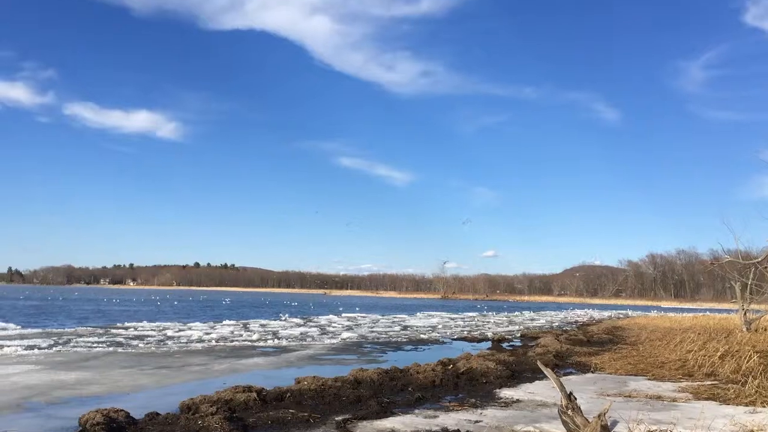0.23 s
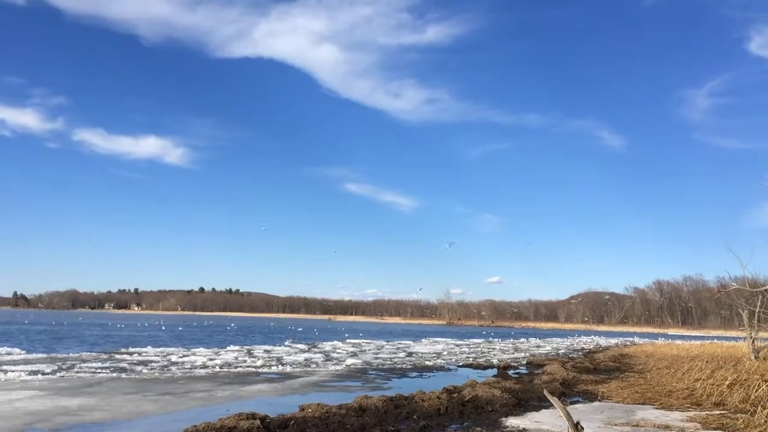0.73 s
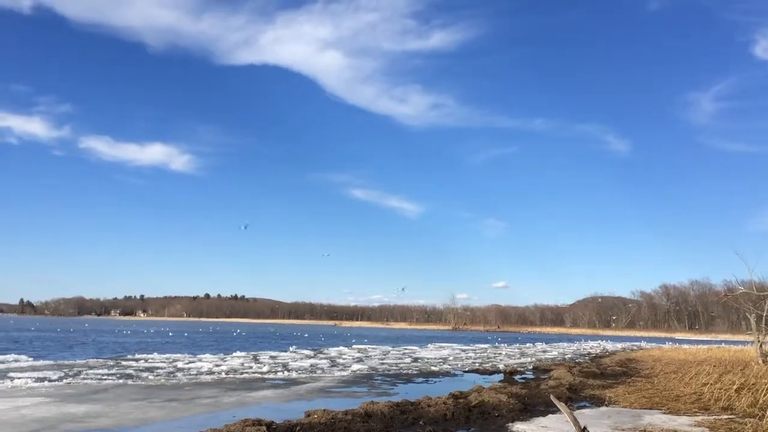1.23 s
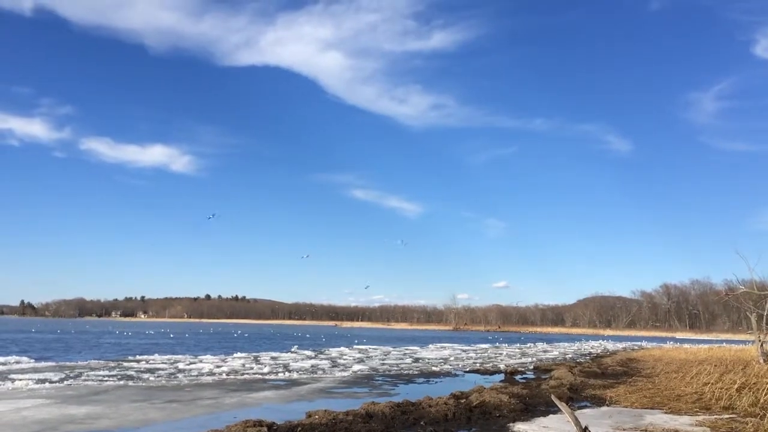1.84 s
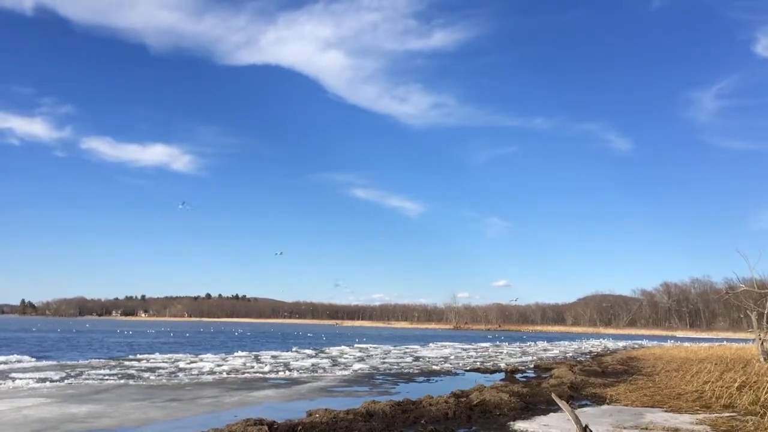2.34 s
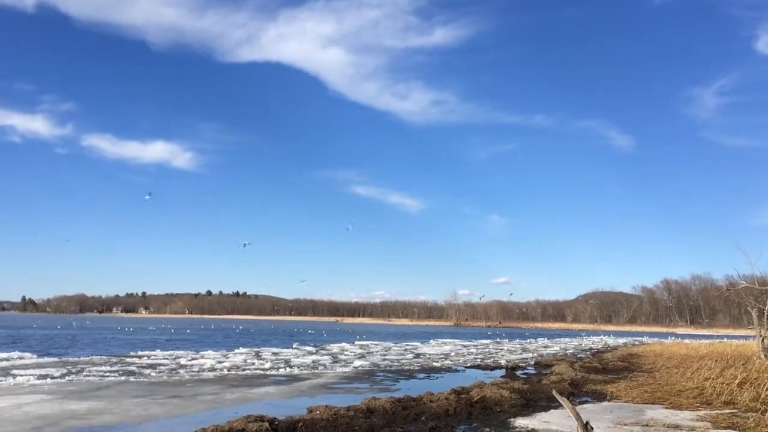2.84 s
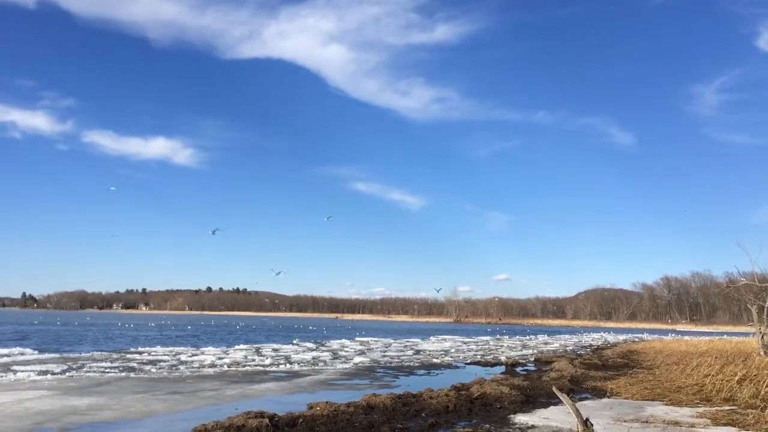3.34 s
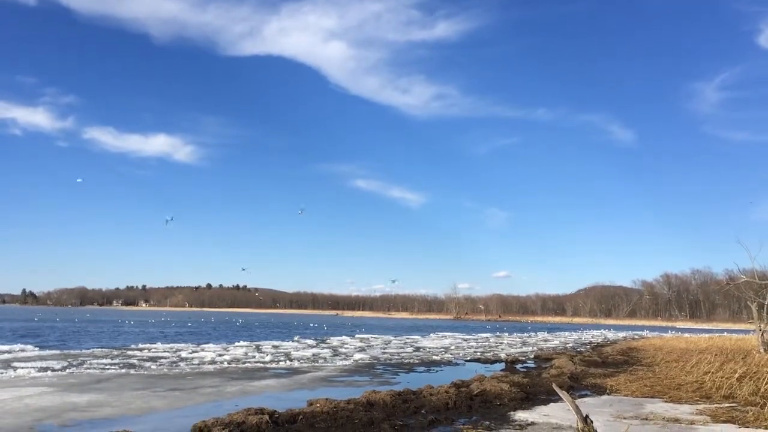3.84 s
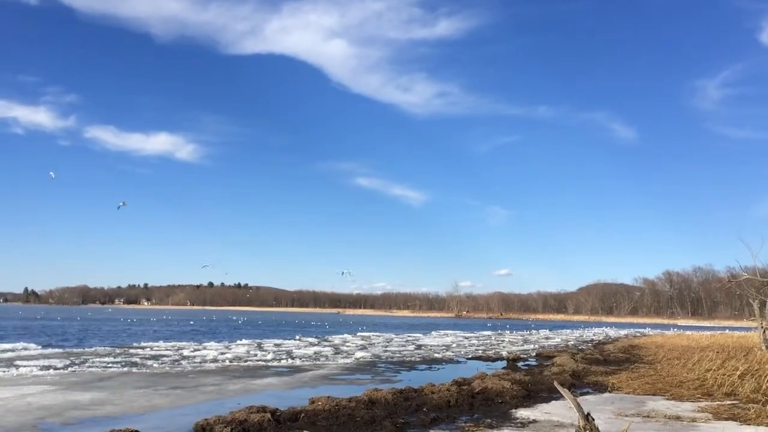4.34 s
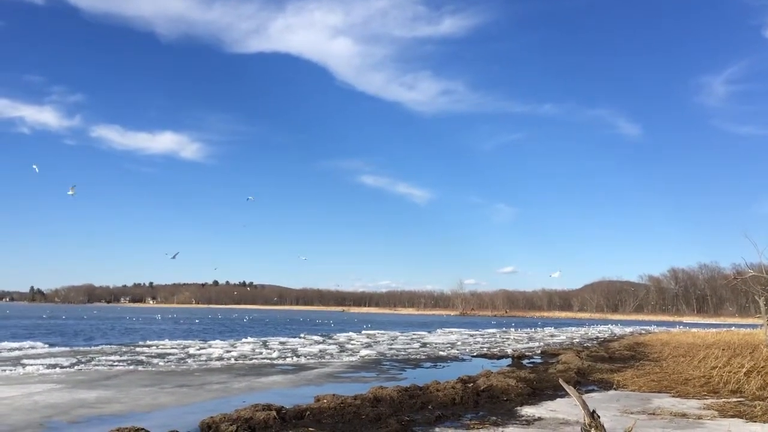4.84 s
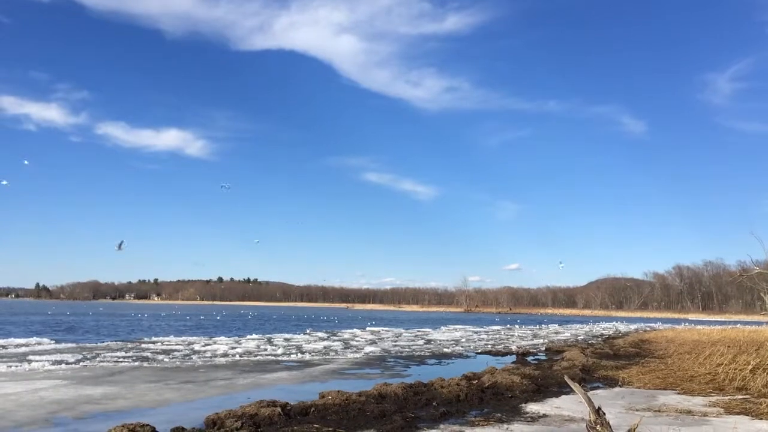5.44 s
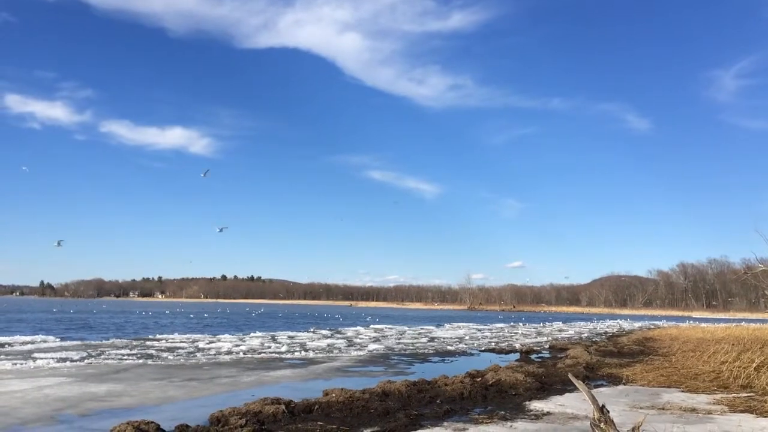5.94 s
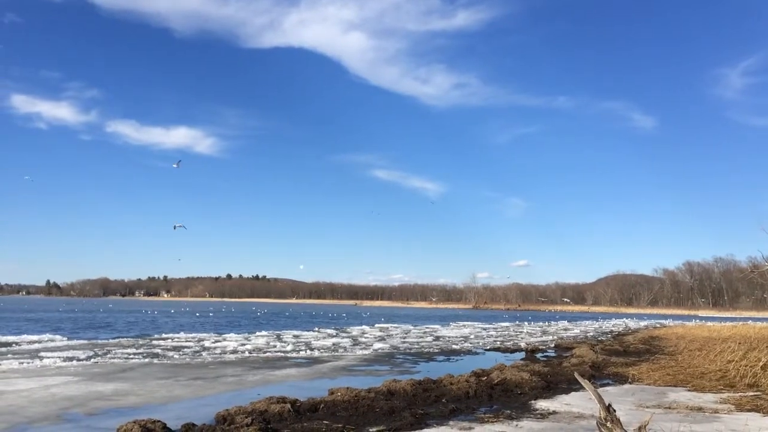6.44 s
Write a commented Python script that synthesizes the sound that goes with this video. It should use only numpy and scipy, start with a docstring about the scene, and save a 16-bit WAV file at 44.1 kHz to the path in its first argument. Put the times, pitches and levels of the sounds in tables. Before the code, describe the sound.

A large flock of gulls calls continuously across a half-frozen bay. Nearer birds give short, reedy wails, squeals and hoarse mews over a blurred wash of distant cries, with a faint echo and a soft bed of air and lapping water. Wind rumbles on the microphone around two seconds in, then returns stronger with low thumps in the second half. It eases near the end as a gull gives a quick run of yelps.

```python
"""Gulls cry from the first moment, a large flock spread over a half-frozen bay.
The near birds give arching, reedy calls that start hoarse and break from one register to another:
a stack of partials shaped by throat and beak. Many more call far out on the water and blur into
a wash, and the wooded shore returns a faint echo. Under them lies a bed of air and lapping water,
while gusts of wind buffet the microphone with rumble and thumps."""
import sys
import numpy as np
from scipy import signal
from scipy.fft import rfft, irfft
from scipy.io import wavfile
from scipy.ndimage import uniform_filter1d

SR = 44100
rng = np.random.default_rng(int(sys.argv[2]) if len(sys.argv) > 2 else 0)


def transcribe(signal):
    """Save signal, clipped to [-1, 1], as a 16-bit WAV file at the path in sys.argv[1]."""
    frames = np.atleast_2d(signal).T
    limited = np.clip(frames, -1, 1)
    pcm = np.round(limited * 32767).astype(np.int16)
    wavfile.write(sys.argv[1], SR, pcm)


N = 295029
TIME = np.arange(N) / SR
TOP_HZ = 15250


def gain_of(db):
    """Decibels to amplitude."""
    return 10 ** (np.asarray(db) / 20)


def unit_rms(x):
    """Scales to rms 1."""
    return x / np.sqrt(np.mean(abs(x) ** 2) + 1e-20)


def curve_at(points, hz):
    """Reads a curve on a log-frequency axis."""
    freq_hz, value = np.transpose(points)
    return np.interp(np.log(hz + 1), np.log(freq_hz + 1), value)


def add(mix, start_s, sound):
    """Drops a sound into the mix."""
    part = mix[max(round(start_s * SR), 0):][:len(sound)]
    part += sound[:len(part)]


def wander(size, hz):
    """Smooth random motion of rms 1, mostly slower than hz."""
    steps = np.arange(size) * 2 * hz / SR
    knots = np.random.default_rng(rng.integers(2 ** 31)).standard_normal(int(steps[-1]) + 2)
    return np.sqrt(3 / 2) * np.interp(steps, np.arange(len(knots)), knots)


def patchy_noise(colour, patchy_db):
    """Coloured noise of rms 1 in which narrow bands briefly swell and sink."""
    hz = np.fft.rfftfreq(1024, 1 / SR)
    real, imag, patches = rng.standard_normal((3, N // 256 + 5, len(hz)))
    patches = uniform_filter1d(patches, size=16, axis=0)  # smooth over time
    patches = unit_rms(uniform_filter1d(patches, size=6, axis=1))  # and over frequency
    frames = (real + 1j * imag) * gain_of(curve_at(colour, hz) + patchy_db * patches)
    return unit_rms(signal.istft(frames.T, nperseg=1024, noverlap=768)[1][:N])


# Tone of the air and water bed: freq_hz, density_db
AIR_SPECTRUM = [(25, -10), (70, -8.5), (450, -3.5), (1000, 0), (3000, -31.5), (6000, -21), (10000, -27.5),
                (15000, -34)]


def air_and_water(level_db=-61):
    """Open air and lapping water make a soft, shifting bed."""
    return gain_of(level_db) * patchy_noise(AIR_SPECTRUM, patchy_db=3.5)


# Gusts at the microphone: start_s, length_s, level_db
GUST_CUES = [(0.557, 0.15, -63), (1.326, 0.047, -57), (1.876, 0.49, -46.5), (3.104, 0.61, -60),
             (3.454, 0.034, -53), (3.839, 0.12, -41.5), (3.967, 0.14, -52), (4.253, 1.488, -44),
             (4.553, 0.19, -41), (4.878, 0.037, -38), (5.002, 0.046, -37), (5.197, 0.2, -42.5),
             (5.787, 0.11, -49.5)]


def gust_envelope(calm_db=-75.5, rise_db_per_s=646, fall_db_per_s=254):
    """Each gust leaps out of the calm, holds, and dies away."""
    power = gain_of(calm_db) ** 2
    for start_s, length_s, level_db in GUST_CUES:
        before_s = np.maximum(start_s - TIME, 0)
        after_s = np.maximum(TIME - start_s - length_s, 0)
        down_db = np.minimum(rise_db_per_s * before_s + fall_db_per_s * after_s, 100)
        power = power + gain_of(level_db - down_db) ** 2
    return np.sqrt(power)


# Wind thumps: time_s, peak_db
EDDY_HITS = [(0.69, -38.5), (1.895, -31), (2.02, -28.5), (2.105, -31.5), (2.213, -28), (2.286, -32),
             (2.358, -28.5), (3.491, -33.5), (3.844, -32.5), (4.252, -28.5), (4.61, -25.5), (4.672, -22.5),
             (4.719, -22), (4.893, -26.5), (5.03, -28.5), (5.062, -25.5), (5.085, -25), (5.193, -26.5),
             (5.366, -27.5), (5.399, -24)]


def eddies(flap, wake_db=-16, wake_s=0.014):
    """Single eddies strike the microphone; stronger ones pass faster and flap more."""
    out = np.zeros(N)
    for time_s, peak_db in EDDY_HITS:
        half_width_s = 0.0023 / 2 ** ((peak_db + 27) / 9.5)  # halves with every 9.5 dB
        near = abs(TIME - time_s) < 0.1
        t = TIME[near] - time_s
        u = t / half_width_s
        push = np.cos(np.pi * u / 2) * np.exp(-(u / 2) ** 2)  # a push between two pulls
        wake_gain = gain_of(wake_db) * (0.0022 / half_width_s) ** 2
        wake = wake_gain * flap[near] * np.exp(-(t / wake_s) ** 2)
        out[near] += gain_of(peak_db) * (push + wake)
    return out


# Tone of the wind rumble: freq_hz, density_db
RUMBLE_SPECTRUM = [(20, -37), (35, -11), (55, 3.5), (85, 4), (120, 0.5), (190, -11.5), (300, -37.5),
                   (600, -62), (1500, -77)]


def wind(rumble_db=3, flap_db=-15, lumpy_db=4, leveller_s=0.0373):
    """Lumpy rumble rides the gusts; the strongest add a higher flapping, and eddies thump on top."""
    hz = np.fft.rfftfreq(N, 1 / SR)
    rumble = irfft(rfft(rng.standard_normal(N)) * gain_of(curve_at(RUMBLE_SPECTRUM, hz)), N)
    rumble /= np.sqrt(uniform_filter1d(rumble ** 2, int(leveller_s * SR)) + 1e-12)
    gust = gust_envelope()
    flap_spectrum = [(80, -26), (170, 4), (280, -6.5), (450, -16), (900, -42.5), (3000, -73)]
    flap = patchy_noise(flap_spectrum, patchy_db=1.5)
    lumps = gain_of(lumpy_db * (np.tanh(2 * wander(N, hz=11)) - 1 / 4))
    buffet = gain_of(rumble_db) * rumble + gain_of(flap_db) * flap * gust / gust.max()
    return gust * lumps * buffet + eddies(flap)


# Reverb time of the shore: freq_hz, t60_s
SHORE_DECAY = [(300, 0.26), (1600, 0.72), (4000, 0.34), (9000, 0.23)]


def shore_echo(sound, echoes_per_s=1500, predelay_s=0.012):
    """Scattered echoes from ice and trees, at the level of the input; the mids ring longest."""
    taps = rng.standard_normal(SR) * (rng.random(SR) < echoes_per_s / SR)
    taps *= np.arange(SR) > predelay_s * SR
    hz, t, frames = signal.stft(taps, SR, nperseg=256)
    decay_db = -60 * t / curve_at(SHORE_DECAY, hz)[:, None]
    tone_db = curve_at([(1800, -18.5), (4000, -13.5), (8000, -8)], hz)[:, None]
    tail = signal.istft(frames * gain_of(decay_db + tone_db), SR, nperseg=256)[1]
    return unit_rms(signal.fftconvolve(sound, tail)[:N]) * np.std(sound)


# The four formants of a gull's throat: low_hz, high_hz
FORMANT_BANDS = [(1250, 2150), (2750, 3550), (4000, 4450), (5600, 6300)]
# Roll-off above the top formant, relative to it: freq_hz, level_db
TOP_ROLLOFF = [(8300, -11), (10000, -22.5), (15000, -33)]


def throat(formants_db, hz, low_cut_db=-17, valley_db=-7):
    """Gain of four resonances with valleys between; little passes below the first."""
    points = [(950, formants_db[0] + low_cut_db)]
    for k, (low_hz, high_hz) in enumerate(FORMANT_BANDS):
        if k:
            valley_hz = (points[-1][0] + low_hz) / 2
            points.append((valley_hz, (formants_db[k - 1] + formants_db[k]) / 2 + valley_db))
        points += [(low_hz, formants_db[k]), (high_hz, formants_db[k])]
    points += [(freq_hz, formants_db[-1] + db) for freq_hz, db in TOP_ROLLOFF]
    return gain_of(np.interp(hz, *np.transpose(points)))


def formant_levels(throat_db, level_db, treble_db):
    """Formant levels for one cry; the treble shifts all but the lowest."""
    return np.array(throat_db) + level_db + treble_db * (np.arange(len(throat_db)) > 0)


def contour(hz, glide_oct, arch_oct):
    """Pitch at the start, middle and end of a cry: a glide with an arch on top."""
    return hz * 2 ** np.array([-glide_oct / 2 - arch_oct, 0, glide_oct / 2 - arch_oct])


def cry(length_s, pitches_hz, formants_db, beak_hz, hoarse, croak_s=0.0028, attack_s=0.0086,
        release_s=0.014, top_hz=TOP_HZ, wobble=0.0031, flutter=0.2, opening_db=7):
    """A reedy voice starts with a croak and glides through its pitches; throat and beak colour it."""
    size = int((max(length_s, 0.02) + release_s / 2) * SR)
    progress, t = np.linspace(0, 1, size), np.arange(size) / SR
    croak = np.exp(-(t / croak_s) ** 2)
    hoarse = np.clip(hoarse + croak, 0, 1)
    glide = np.polyfit(np.linspace(0, length_s, len(pitches_hz)), pitches_hz, len(pitches_hz) - 1)
    hz = np.polyval(glide, t) * (1 - 0.053 * croak)  # the croak scoops up from below
    effort = gain_of(9.5 * np.log2(hz / hz.mean()))  # louder where the voice is higher
    hz = hz * (1 + wobble * wander(size, hz=23.2))
    jitter = (0.0033 + 0.013 * hoarse) * wander(size, hz=89.8)
    cycle = np.exp(2j * np.pi * np.cumsum(hz * (1 + jitter)) / SR)
    # the beak is widest in mid-cry, where it shifts the treble by opening_db against the ends
    opening = gain_of(opening_db * (1 / 4 - (2 * progress - 1) ** 2))
    voice, wave = np.zeros(size), 1
    for k in range(1, min(int(top_hz / hz.mean()), 12) + 1):
        wave = wave * cycle * np.exp(2j * np.pi * rng.random())  # each partial has its own delay
        smear_hz = 170 * np.sqrt(k)  # uneven cycles smear each partial into a band
        rasp = (wander(size, smear_hz) * wave.real + wander(size, smear_hz) * wave.imag) / np.sqrt(2)
        partial = (np.sqrt(1 - hoarse ** 2) * wave.real + hoarse * rasp) * throat(formants_db, k * hz)
        beak_ring = gain_of(12 * np.exp(-(np.log2(k * hz / beak_hz) / 0.15) ** 2))
        is_treble = k * hz.mean() > FORMANT_BANDS[1][0]
        voice += partial * beak_ring * (opening if is_treble else 1)
    level = effort * (1 + flutter * wander(size, hz=26.9))  # turbulent air on the way
    fades = np.clip(np.minimum(t / attack_s, (t[-1] - t) / release_s), 0, 1)
    return np.sqrt(2) * voice * level * np.sin(np.pi / 2 * fades) ** 2


def far_gulls(count=96, spread_db=7, arch=0.06955, droop=0.1113):
    """Distant birds, dulled by the air: each cry arches and droops, in the high or the low register."""
    out = np.zeros(N)
    for k, draws in enumerate(rng.random((count, 8))):
        when, length, pitch, register, bend, loudness, hoarse, beak = draws
        hz = (1350 + 700 * pitch) / (1 if register < 0.5 else 2)
        pitches_hz = hz * np.array([1 - arch * 2 * bend, 1, 1, 1 - droop * 2 * (1 - bend)])
        voice = cry(0.06 + 0.11 * length, pitches_hz, formants_db=[5.5, -10, -12.5, -14],
                    beak_hz=1400 * 2 ** (1.246 * beak), hoarse=0.22 * hoarse, top_hz=5270)
        start_s = (k + when) / count * TIME[-1] - 0.1
        add(out, start_s, gain_of(spread_db * (2 * loudness - 1)) * unit_rms(voice))
    return unit_rms(out)


# Fader ride on the distant flock: time_s, level_db
FLOCK_FADER = [(0.1, -52.5), (0.7, -51.5), (1.5, -55), (1.9, -50.5), (2.6, -53), (3.6, -53.5), (4.3, -52),
               (5.0, -50.5), (5.6, -56), (6.3, -53.5), (6.7, -50)]
# Tone of the blurred wash of calls: freq_hz, density_db
WASH_SPECTRUM = [(300, -14.5), (600, -6), (850, -6.5), (1050, -9), (1350, 2.5), (1800, -0.5), (2700, -5.5),
                 (4200, -12.5), (5500, -20.5), (8000, -76), (14000, -54)]


def flock(voices_db=-2, echo_db=-10, wash_db=-3):
    """The far birds, their echo, and the wash of those too far to tell apart."""
    voices = far_gulls()
    echo = gain_of(echo_db) * shore_echo(voices)
    wash = gain_of(wash_db) * patchy_noise(WASH_SPECTRUM, patchy_db=3.5)
    fader_db = np.interp(TIME, *np.transpose(FLOCK_FADER))
    return gain_of(fader_db) * (gain_of(voices_db) * voices + echo + wash)


# Throat of the high register (whines, squeals, wails): level_db per formant
HIGH_FORMANTS = [-0.5, -10, -12.5, -26.5]
# Thin cries from further out: start_s, length_s, pitch_hz, glide_oct, level_db
WHINE_CUES = [(0.563, 0.069, 2810, -.06, -57.5), (0.872, .055, 2130, -0.041, -51),
              (1.248, .11, 1241, 0.052, -53), (1.892, 0.23, 3305, -.01, -61.5),
              (1.894, .07, 1334, -0.4, -53.5), (2.198, 0.15, 1442, -.25, -52),
              (2.338, .095, 1640, .33, -47.5), (2.79, .17, 2138, .19, -54),
              (3.132, .11, 2100, 0.092, -54.5), (3.446, 0.086, 1933, -0.065, -52),
              (3.49, 0.054, 1360, -.22, -49.5), (3.634, 0.12, 2560, -0.046, -60.5),
              (4.613, 0.078, 2313, .1, -58.5), (4.93, 0.092, 2410, -.2, -55.5),
              (5.072, 0.081, 1410, -.3, -53), (5.235, .08, 1640, -.15, -54),
              (5.314, 0.26, 2420, .05, -60.5), (5.39, 0.16, 1440, -.3, -62),
              (5.567, .15, 2240, -0.25, -56.5), (5.762, .06, 1950, -.04, -54.5),
              (6.328, 0.05, 1766, -.08, -53), (6.614, 0.048, 2276, 0.13, -52.5)]


def whines():
    """Birds at middle distance: the air leaves them one strong partial."""
    out = np.zeros(N)
    for start_s, length_s, hz, glide_oct, level_db in WHINE_CUES:
        pitches_hz = contour(hz, glide_oct, arch_oct=0.0248)
        voice = cry(length_s, pitches_hz, HIGH_FORMANTS, beak_hz=hz, hoarse=0.23)
        add(out, start_s, gain_of(level_db) * unit_rms(voice))
    return out


# Piercing cries: start_s, length_s, pitches_hz (five, evenly spaced), level_db, treble_db,
# beak_hz, hoarse (0-1)
SQUEAL_CUES = [(1.9, 0.225, [1660, 1760, 1850, 1895, 1660], -44.5, -6, 3700, .25),
               (2.505, 0.11, [2190, 2195, 2135, 2060, 1970], -46.5, 1, 4400, .35),
               (3.976, 0.145, [2064, 2062, 2030, 1935, 1875], -48, 19, 9000, .05),
               (5.18, 0.115, [1920, 2060, 2100, 2020, 1940], -51.5, 8.5, 6300, .1)]


def squeals(fade_db=-12):
    """Clear cries that start sharply, hold or climb, and fade as the pitch sags."""
    out = np.zeros(N)
    for start_s, length_s, pitches_hz, level_db, treble_db, beak_hz, hoarse in SQUEAL_CUES:
        formants_db = formant_levels(HIGH_FORMANTS, level_db, treble_db)
        voice = cry(length_s, pitches_hz, formants_db, beak_hz, hoarse, attack_s=0.0044,
                    release_s=0.017, wobble=0.0012, flutter=0.15, opening_db=-3.5)
        add(out, start_s, voice * gain_of(fade_db * np.linspace(0, 1, len(voice)) ** 4))
    return out


def play_cries(cues, throat_db, croak_s, attack_s, release_s):
    """Plays one kind of cry; each is half way up its attack at its start time."""
    out = np.zeros(N)
    for start_s, length_s, hz, glide_oct, arch_oct, level_db, treble_db, beak_hz, hoarse in cues:
        pitches_hz = contour(hz, glide_oct, arch_oct)
        formants_db = formant_levels(throat_db, level_db, treble_db)
        voice = cry(length_s + attack_s / 2, pitches_hz, formants_db, beak_hz, hoarse,
                    croak_s, attack_s, release_s)
        add(out, start_s - attack_s / 2, voice)
    return out


# Throat of a yelp: level_db per formant
YELP_FORMANTS = [-4, -10, -16.5, -27.5]
# A late run of yelps: start_s, length_s, pitch_hz, glide_oct, level_db, beak_hz
YELP_CUES = [(5.938, 0.071, 811, -0.05, -54, 2410), (6.025, 0.058, 844, 0.15, -54.5, 2470),
             (6.102, 0.061, 890, -0.076, -57, 2650), (6.177, 0.075, 846, -0.063, -54, 2420),
             (6.253, 0.037, 825, -0.12, -54, 2430), (6.413, 0.038, 918, 0.21, -52.5, 1950),
             (6.449, 0.061, 1001, 0.013, -50.5, 4270)]


def yelps(arch_oct=0.05, hoarse=0.32):
    """A chatter of short, husky notes in the low register."""
    cues = [(start_s, length_s, hz, glide_oct, arch_oct, level_db, 0, beak_hz, hoarse)
            for start_s, length_s, hz, glide_oct, level_db, beak_hz in YELP_CUES]
    return play_cries(cues, YELP_FORMANTS, croak_s=0.0079, attack_s=0.01, release_s=0.017)


# Throat of a catch: level_db per formant
CATCH_FORMANTS = [3, -16.5, -5.5, -22.5]
# Rough lead-ins: start_s, length_s, pitch_hz, glide_oct, level_db, treble_db, hoarse (0-1)
CATCH_CUES = [(1.08, 0.037, 774, 0.16, -51.5, -6.5, 0.42), (1.657, 0.071, 785, 0.3, -50.5, -1, 0.6),
              (2.437, 0.04, 1060, 0.26, -51, 0.5, 0.6), (3.237, 0.049, 895, 0.18, -53.5, -6.5, 0.6),
              (3.755, 0.034, 820, 0.25, -61.5, 10.5, 0.9), (3.852, .018, 876, 0.25, -45.5, -7, 0.6),
              (3.876, .03, 752, 0.16, -51, 0, 0.3), (3.963, 0.015, 827, 0.091, -44, -1.5, 0.4),
              (4.272, 0.041, 879, 0.22, -44.5, -8.5, 0.77), (4.689, 0.053, 813, 0.11, -51, -6, 0.5)]


def catches(beak_hz=3360):
    """Hoarse upward sweeps: the voice catches before it breaks into a clear note."""
    cues = [(start_s, length_s, hz, glide_oct, 0, level_db, treble_db, beak_hz, hoarse)
            for start_s, length_s, hz, glide_oct, level_db, treble_db, hoarse in CATCH_CUES]
    return play_cries(cues, CATCH_FORMANTS, croak_s=0.004, attack_s=0.0089, release_s=0.014)


# Throat of a mew: level_db per formant
MEW_FORMANTS = [0.5, -10.5, -8.5, -24]
# Low cries: start_s, length_s, pitch_hz, glide_oct, arch_oct, level_db, treble_db, beak_hz,
# hoarse (0-1)
MEW_CUES = [(.64, .13, 935, -0.086, 0.12, -61.5, 6, 2740, 0.17),
            (1.125, 0.1, 816, 0.057, -0.0016, -53.5, -10.5, 3150, 0.34),
            (1.714, .19, 845, -0.14, 0.085, -45.5, -10.5, 3630, 0.1),
            (2.56, 0.152, 819, 0.05, -0.05, -54, -3.5, 3600, 0.4),
            (3.285, 0.13, 836.5, 0.131, -0.0313, -49, -8.5, 3830, 0.03),
            (3.781, 0.082, 914, 0.053, 0.0026, -58, 10.5, 2780, 0.087),
            (3.906, 0.0705, 793, -0.024, -0.05, -53, 12, 1630, 0.4),
            (4.297, 0.1445, 847, 0.04, -0.01, -45.5, -6.5, 3300, 0.073),
            (4.885, 0.184, 841, 0.027, 0.025, -48.5, -11, 3850, 0.078),
            (5.13, 0.073, 940, 0.021, 0.02, -59.5, 8, 3160, 0.11),
            (5.6, 0.11, 930, 0.018, 0.034, -71, 15, 5420, 0.69),
            (6.55, 0.14, 810, 0.019, -0.032, -53, -5, 4620, 0.055)]


def mews():
    """Nasal cries that set in abruptly, an octave below the wails."""
    return play_cries(MEW_CUES, MEW_FORMANTS, croak_s=0.0055, attack_s=0.0076, release_s=0.0067)


# High cries: start_s, length_s, pitch_hz, glide_oct, arch_oct, level_db, treble_db, beak_hz,
# hoarse (0-1)
WAIL_CUES = [(.1, 0.036, 1618, -0.108, 0.096, -46.5, -13.5, 3200, 0.5),
             (.373, .11, 1656, -0.058, 0.086, -49, -4.5, 3370, 0.03),
             (.4, 0.2, 1382, -0.25, 0.054, -53, -0.5, 1340, 0),
             (.705, 0.13, 1635, 0, 0.1, -50, -10.5, 3370, 0.1),
             (.851, 0.031, 1920, 0.087, 0.0042, -53, -11, 1880, 0.2),
             (1.362, 0.3, 1805, 0.02, 0.25, -57.5, -5.5, 3530, 0),
             (1.84, 0.046, 1340, 0.14, -0.043, -49, -8.5, 2600, 0.23),
             (2.428, 0.044, 1863, 0.032, -0.02, -51.5, 7, 1890, .3),
             (2.474, 0.026, 1826, -0.01, .005, -45.5, 3, 1810, 0.14),
             (2.506, 0.26, 1354, -0.3, 0.001, -49, -17, 3940, 0.35),
             (2.6, 0.18, 1780, -.26, 0, -47, -10, 4930, 0.57),
             (2.71, 0.061, 2050, -.03, 0.0098, -54.5, -4, 4170, 0.5),
             (2.775, 0.086, 1503, -0.32, 0.015, -44.5, -20, 4600, 0.25),
             (3.35, 0.0745, 1742, 0.174, -0.032, -51, -27, 2600, 0),
             (3.872, 0.065, 2220, -0.0053, 0.05, -53.5, 16.5, 5300, 0.1),
             (3.98, 0.22, 1402, -0.33, -0.053, -54, -4, 6000, 0.53),
             (4.45, 0.091, 1602, -0.239, 0.046, -49.5, -4, 3590, 0.2),
             (4.746, 0.19, 1359, -.23, -0.02, -46.5, -6, 4620, 0.11),
             (4.825, 0.16, 1648, -0.037, 0.047, -59.5, 10, 5900, 0.2),
             (5.675, 0.098, 1943, -0.092, 0.016, -60.5, 11, 5950, 0.23)]


def wails():
    """Falling or arching cries in the high register, with a soft release."""
    return play_cries(WAIL_CUES, HIGH_FORMANTS, croak_s=0.0046, attack_s=0.006, release_s=0.027)


def scene(wail_db=2.5, mew_db=2, echo_db=-14):
    """Near gulls and their echo over the far flock, open air and wind, in mono."""
    gulls = gain_of(wail_db) * wails() + gain_of(mew_db) * mews()
    gulls += catches() + yelps() + squeals() + whines()
    bed = air_and_water()
    echo = gain_of(echo_db) * shore_echo(gulls)
    return (gulls + echo + flock() + bed + wind())[None]


def record(dry, open_s=0.119):
    """Near silence, a 2 ms fade-in at open_s, and a steep low-pass over everything."""
    fade_in = np.clip((TIME - open_s) / 0.002, gain_of(-48), 1)
    low_pass = signal.firwin(511, TOP_HZ, window=("kaiser", 9), fs=SR)
    return signal.oaconvolve(dry * fade_in, low_pass[None], "same")


dry = scene()
out = record(dry)
transcribe(out)
```